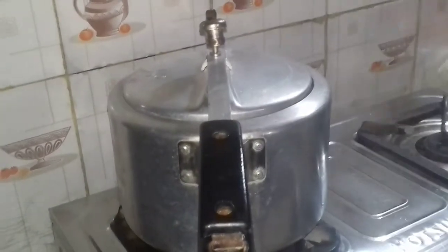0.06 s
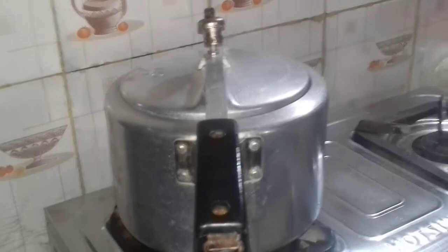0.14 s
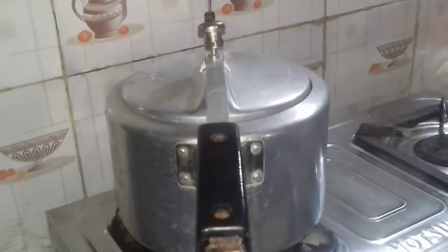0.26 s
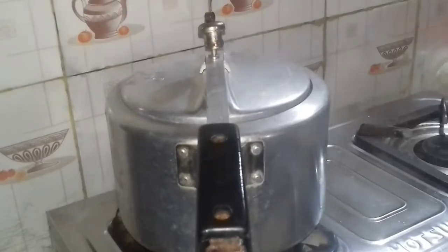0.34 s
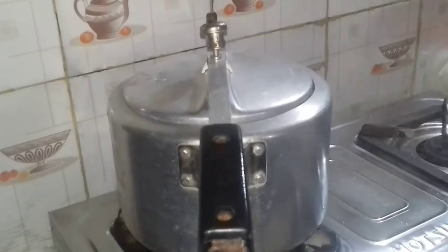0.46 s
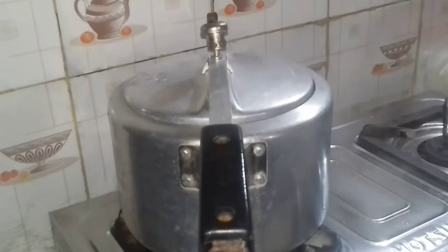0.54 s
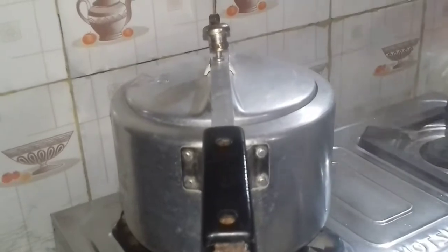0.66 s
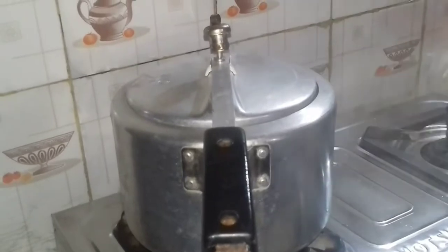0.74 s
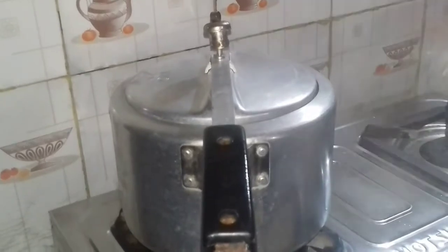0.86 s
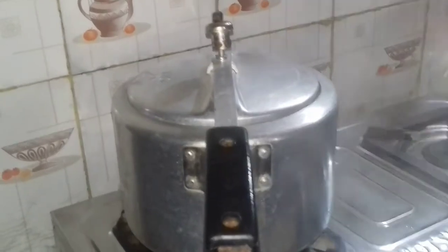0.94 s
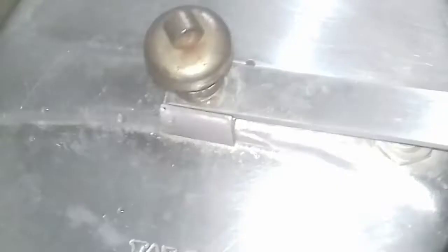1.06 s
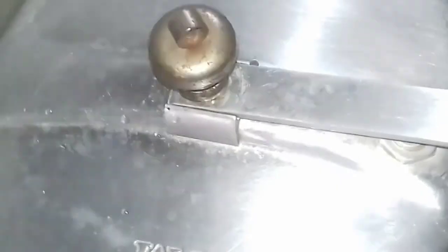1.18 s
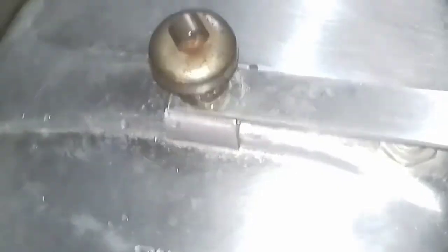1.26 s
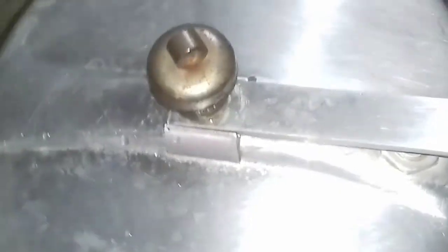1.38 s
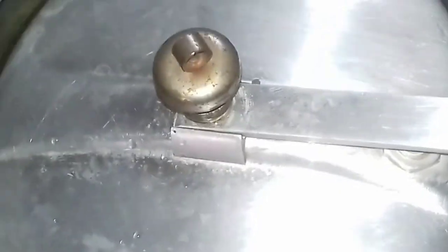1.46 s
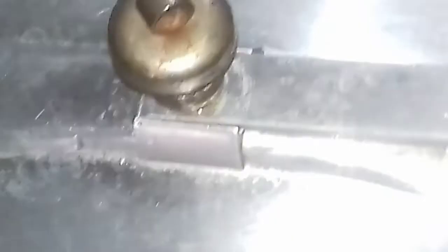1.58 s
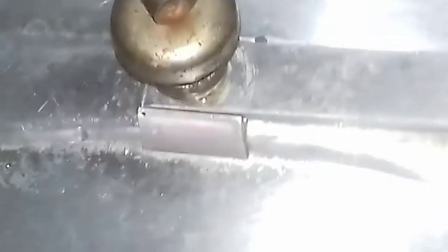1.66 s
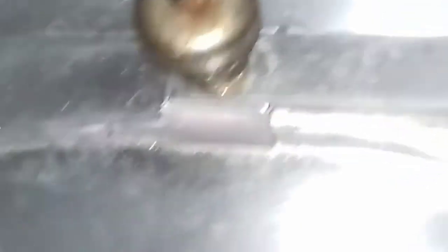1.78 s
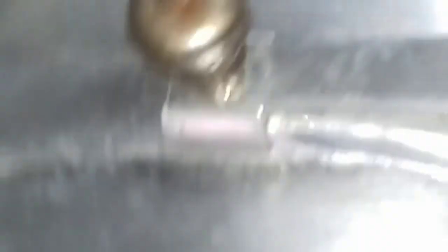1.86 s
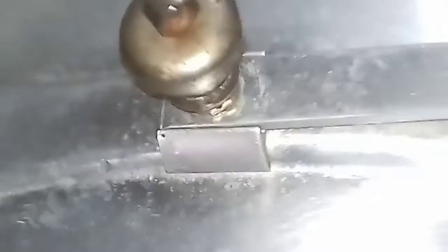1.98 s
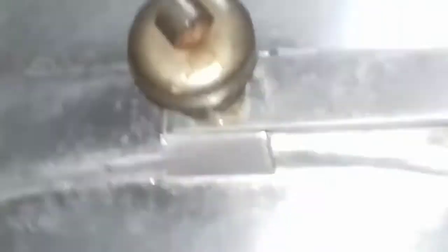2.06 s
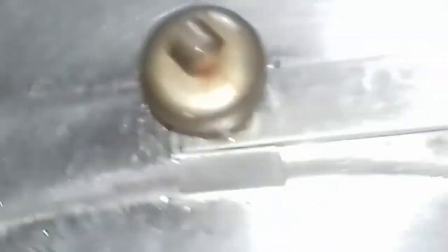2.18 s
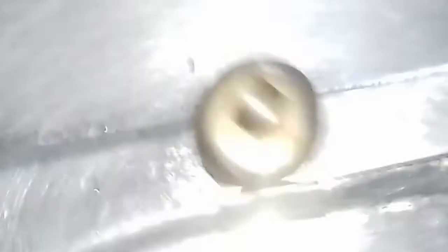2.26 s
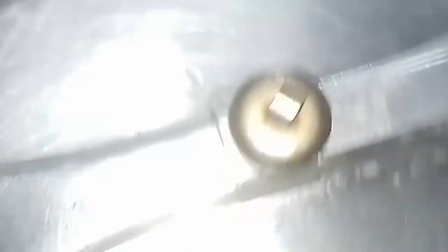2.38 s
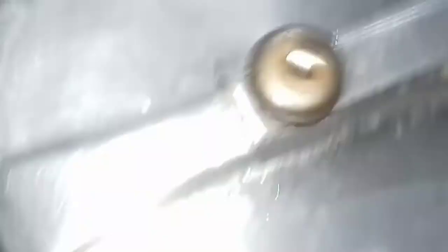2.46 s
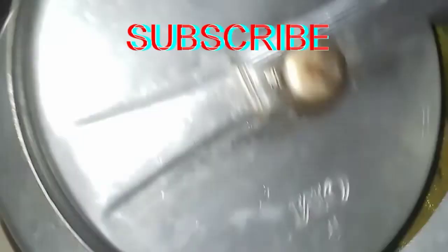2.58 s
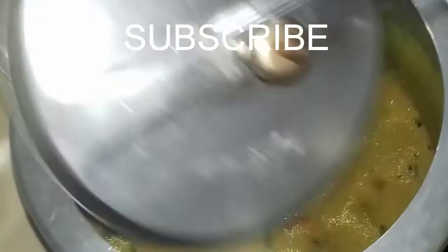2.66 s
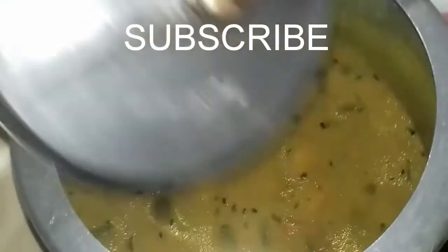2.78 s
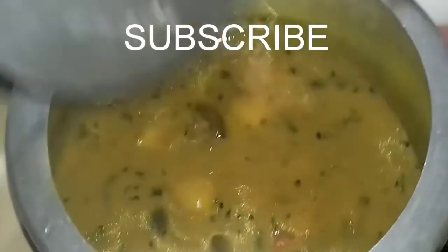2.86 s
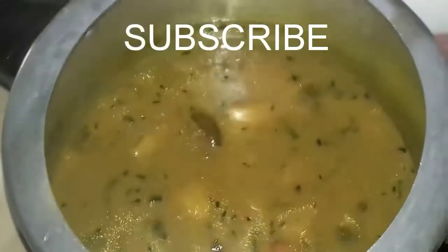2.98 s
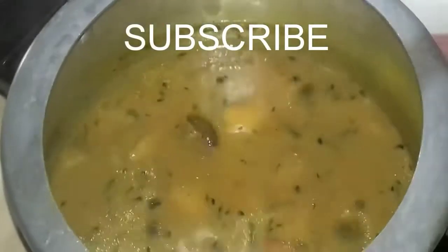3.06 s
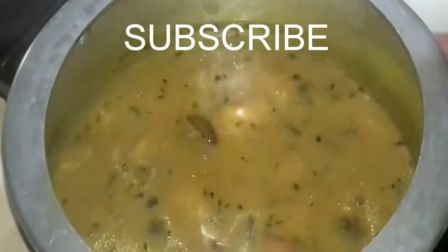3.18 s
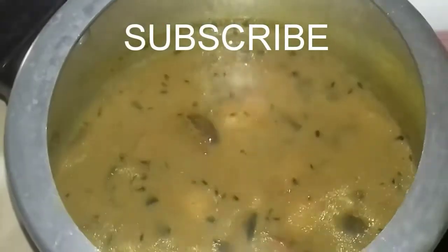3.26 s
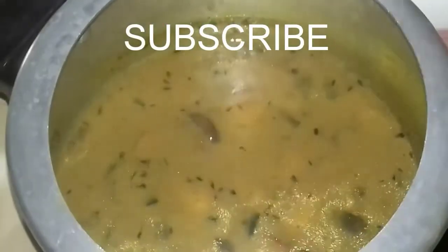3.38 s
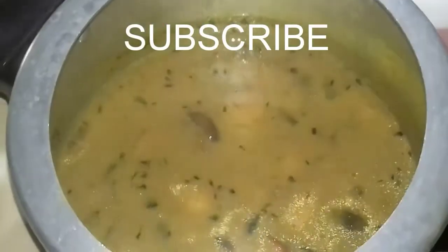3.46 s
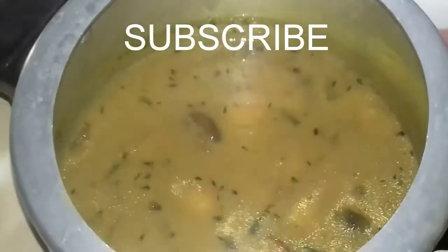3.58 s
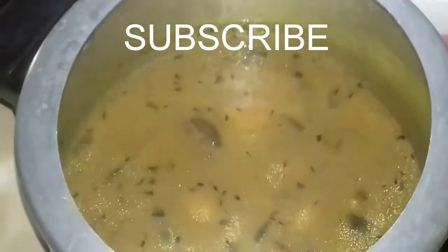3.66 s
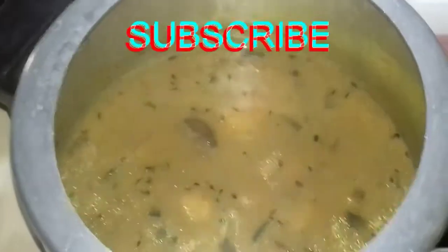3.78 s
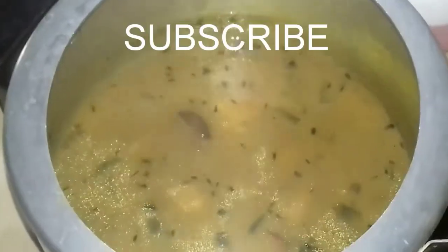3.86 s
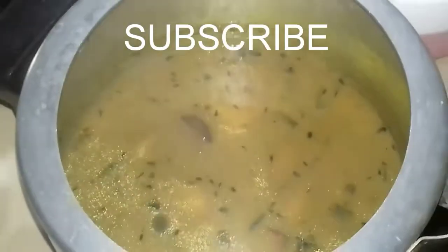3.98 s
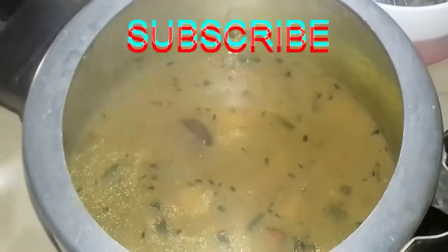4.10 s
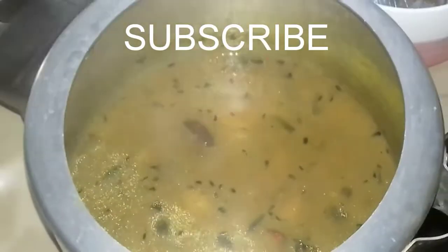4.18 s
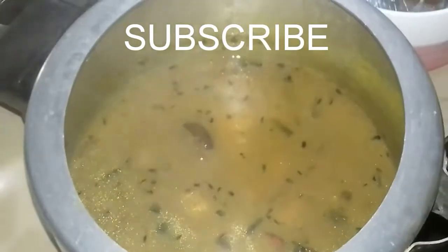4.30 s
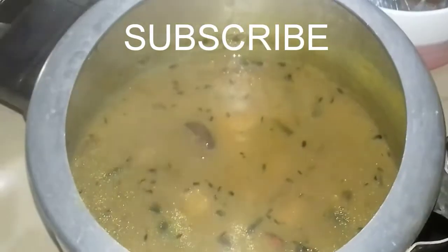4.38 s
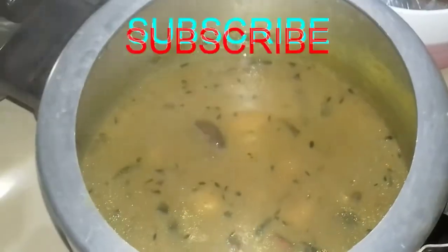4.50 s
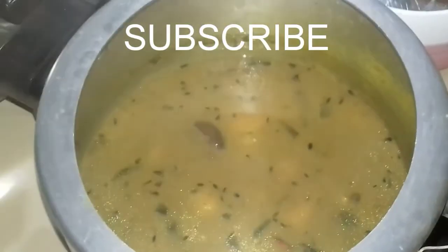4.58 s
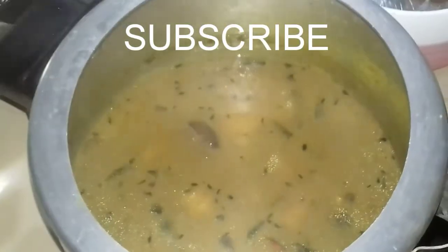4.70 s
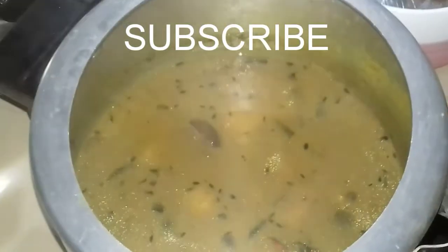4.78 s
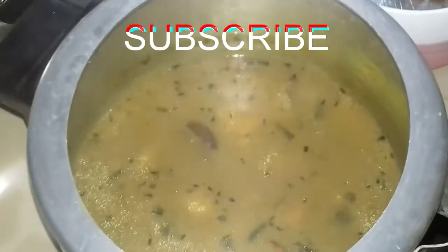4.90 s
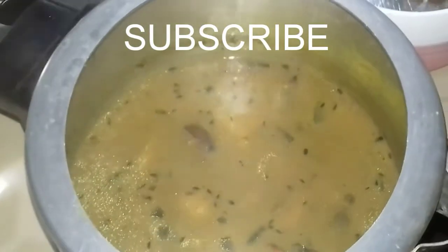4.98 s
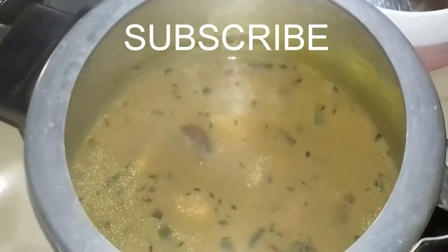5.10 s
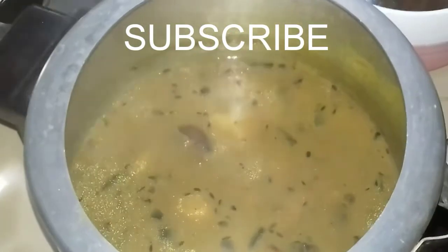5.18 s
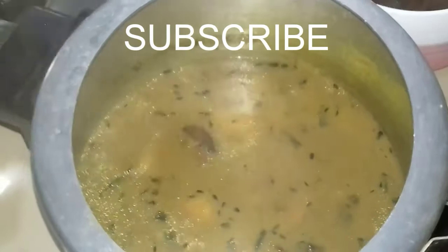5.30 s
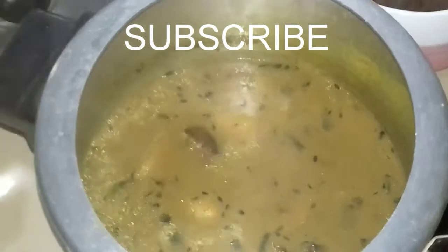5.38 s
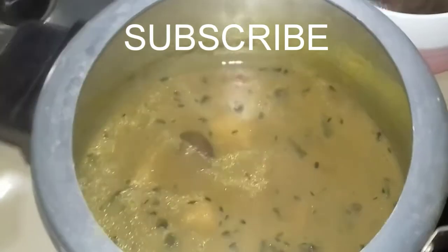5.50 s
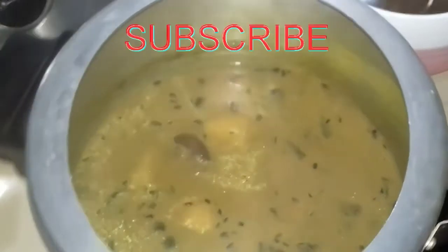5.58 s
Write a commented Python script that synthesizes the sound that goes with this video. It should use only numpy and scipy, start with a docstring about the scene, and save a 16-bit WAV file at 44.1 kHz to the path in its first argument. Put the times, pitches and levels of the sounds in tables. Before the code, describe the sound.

Loud pressure cooker steam hiss fades away, then a metal lid scrapes and knocks loose close by, followed by a few pan clanks.

```python
"""A hiss of steam from a pressure cooker in a tiled kitchen fades to silence, then a lid is worked loose close by.
The steam is noise coloured by the vent's resonances. The lid scrapes, drones and knocks its way out of the rim,
and pans and utensils clank: tiny blows set off the ringing modes of the metal, and a room tail is added.
A handle creaks in a short run of dull ticks. Low, steady noise is the kitchen behind the open pot."""
import sys
import numpy as np
from scipy import signal
from scipy.fft import rfft, irfft
from scipy.io import wavfile
from scipy.ndimage import uniform_filter1d

SR = 44100
rng = np.random.default_rng(int(sys.argv[2]) if len(sys.argv) > 2 else 0)


def log_audio(samples):
    """Write samples as a 16-bit WAV file to the path given in sys.argv[1]."""
    # one column per channel
    frames = np.atleast_2d(samples).T
    # limit to full scale, then quantise
    limited = np.clip(frames, -1, 1)
    pcm = np.round(limited * 32767).astype(np.int16)
    wavfile.write(sys.argv[1], SR, pcm)


N = 248724
TIME, HZ = np.arange(N) / SR, np.fft.rfftfreq(N, 1 / SR)

# What the lid rings with. Each row: pitch in Hz, width in Hz, relative level in dB (before the width counts).
LID_RINGING = [(354, 34.4, 1.5), (594, 84, -10), (716, 270, -12.5), (1270, 250, -20.5), (1882, 65, -3),
               (2410, 100, -10.5), (2980, 48, -20.5), (3525, 42, -23.5), (3900, 32, -28), (4360, 290, -26),
               (5900, 45, -29), (7000, 36, -38), (8760, 80, -75), (10150, 54, -39)]
# The lid's many weak modes between the main ones. Each row: frequency in Hz, relative level in dB per Hz.
LID_WEAK_MODES = [(150, -63), (290, 0), (400, -1), (480, -19), (600, -10), (900, 4), (1400, -4.5),
                  (1800, 11), (2400, -2), (2800, -9), (3300, -16), (4200, -24), (6000, -16.5),
                  (7800, -28.5), (10000, -24), (15500, -34)]


def steam(flutter_db=0.49, echo_db=-9, treble_db=1.24):
    """Rushing steam is noise shaped by the vent; it fades in a straight line while its treble dulls."""
    # The plain hiss. Each row: frequency in Hz, relative level in dB per Hz.
    jet_colour = [(18, -62.5), (30, -23), (103, -16), (352, -19), (626, -16), (1000, -17.5), (1300, -11),
                  (1740, -11.5), (2200, -3.5), (3180, -0.5), (4580, -2), (5960, -12), (10600, -10),
                  (13100, -20), (15700, -25)]
    # Resonances and hollows of the vent and its weight. Each row: centre in Hz, width in Hz, boost or cut in dB.
    vent_peaks = [(1330, 200, 0.5), (1790, 39, -10.5), (1920, 90, 1.5), (2260, 160, 1.5), (2390, 110, -5.5),
                  (2710, 50, 2), (2980, 30, 1.5), (3235, 28, 8), (3670, 30, 0), (4050, 62, 4.5),
                  (4330, 150, 1.5), (5500, 100, 5.5), (5980, 300, -1), (6280, 200, 6.5), (6950, 50, 4),
                  (8436, 30, 1), (9450, 65, 6.5), (10550, 500, -1), (11500, 900, -3.5), (12500, 700, 5.5)]
    level_db, end_s, dulls_db_per_s = -20.4, 1.011, 1

    colour_db = read(jet_colour, HZ)
    for hz, width, db in vent_peaks:
        colour_db = colour_db + db / (1 + (2 * (HZ - hz) / width) ** 2)
    jet = evened(room(noise(colour_db), echo_db))
    treble = band(jet, 7300, 17000, order=1)
    jet = jet + treble * (gain_of(treble_db - dulls_db_per_s * TIME) - 1)
    flutter = evened(noise(read([(8, 1.5), (60, -1), (300, -56)], HZ)))
    fade = np.maximum(1 - TIME / end_s, 0)
    return gain_of(level_db + flutter_db * flutter) * jet * fade


def lid(lowest_hz=305):
    """The hand-held lid knocks on the rim, close by, so it is damped and fairly dry."""
    # Lid against rim. Each row: start in seconds, strength in dB, weight behind the blow in dB,
    # hardness of the contact in dB, ring of the struck spot in Hz, rattle time in seconds (to fall 60 dB).
    lid_blows = [(1.826, -59.5, 7, -6, 2190, .14), (1.89, -50, -7, 13, 3060, 0.024),
                 (1.909, -42.5, 4, -0.5, 2095, 0.044), (2.056, -58, 5, 10, 2750, 0.051),
                 (2.082, -60.5, -12, 18, 2990, 0.028), (2.116, -37, -4.5, -3, 1930, 0.1),
                 (2.171, -46, 0, -2, 1720, 0.135), (2.317, -40, 4.5, 7.5, 1650, 0.077),
                 (2.3394, -30, 3.5, 7.5, 1850, .15), (2.375, -27.5, 13.5, 1.5, 2410, 0.03),
                 (2.406, -30, -11.5, -13, 2460, 0.024), (2.511, -32.5, -3.5, -4.5, 1858, 0.055),
                 (2.5419, -30, -8.5, 2.5, 2090, 0.0443), (2.558, -35, -4.5, 3, 2015, 0.088),
                 (2.636, -46, 4.5, -8.5, 2065, 0.021), (2.654, -44.5, 1.5, -19, 2194, 0.27),
                 (2.718, -52, -1, -9, 1094, 0.012), (2.896, -46, -8.5, -25, 1800, 0.0097),
                 (2.986, -50.5, -20, 6, 2190, 0.03)]
    # A plain blow: level over its strength in dB, for thud, body, clang, clink and tick.
    lid_plain_db = [-6.5, -6, 0, -14, -20]

    out = np.zeros(N)
    for s, strength_db, weight_db, hardness_db, spot_hz, rattle_s in lid_blows:
        metal = ring(LID_RINGING, LID_WEAK_MODES, sustain=0.62, spot_hz=spot_hz, spot_db=-3.5,
                     spot_t60=0.065, dense_db=-3.5, dense_t60=0.065)
        metal = band(metal, lowest_hz, 24000, order=6)  # a small plate radiates little below its first mode
        levels_db = registers(lid_plain_db, strength_db, weight_db, hardness_db, spot_hz)
        add(out, s, knock(metal, levels_db, rattle_s, rattle_db=-10, rattle_lowest_hz=754, wet_db=-10.5))
    return out


def pans():
    """Pans and utensils clank further off: struck metal with more of the room."""
    # Each row: start in seconds, strength in dB, weight behind the blow in dB, hardness of the contact in dB,
    # ring of the struck spot in Hz, rattle time in seconds (to fall 60 dB).
    pan_blows = [(1.0299, -33, 0, 6, 742, 0.21), (1.2545, -35.5, 1.5, 2.5, 1826, .32),
                 (1.343, -46.5, 0, -1, 1550, 0.052), (1.566, -65, 15.5, 10.5, 652, 0.031),
                 (3.698, -52.5, -3.5, 2, 2030, 0.031), (3.771, -55.5, -2, -11, 1770, 0.035),
                 (3.928, -47.5, 5.5, 6.5, 2965, 0.043), (3.958, -53.5, 10, 8, 1720, 0.024),
                 (3.9786, -42, 2.5, 8.5, 2866, 0.1055), (4.0619, -35.5, -4.5, -9, 1335, 0.1),
                 (4.109, -44, 11.5, 4, 1680, 0.039), (4.132, -41, -17, -3, 1990, 0.049),
                 (4.174, -38, -8, -9, 2050, 0.117), (4.195, -41, -1, 5, 2130, 0.035),
                 (4.3163, -36, 3, -12, 1405, 0.027), (4.809, -69.5, 9, 14, 2450, 0.036),
                 (5.136, -49, 4.5, 0, 1570, 0.073), (5.509, -58, -7, -1, 1795, 0.032),
                 (5.606, -59.5, -23, -13, 1530, 0.038)]
    # What the pans ring with. Each row: pitch in Hz, width in Hz, relative level in dB (before the width counts).
    pan_ringing = [(168, 22, -28.5), (296, 58, 12), (900, 44, 11.5), (1380, 54, -33), (1640, 60, -19),
                   (1850, 32, 19), (2136, 62, 1), (2260, 14, -13), (2600, 35, -21), (3000, 94, -21),
                   (3750, 10, -22), (4900, 33, -18), (5700, 80, -34), (6600, 51, -24)]
    # Weak modes between the main ones. Each row: frequency in Hz, relative level in dB per Hz.
    pan_weak_modes = [(130, 8), (200, -6), (260, 14.5), (520, -1.5), (850, -0.5), (1150, -8), (1500, -1),
                      (2100, -5.5), (2650, -15), (3100, -41), (3800, -14.5), (5000, -20), (6100, -19),
                      (7800, -30.5), (10000, -24.5), (15500, -32)]
    # A plain blow: level over its strength in dB, for thud, body, clang, clink and tick.
    pan_plain_db = [-5.5, -5.5, 0, -14, -20]

    out = np.zeros(N)
    for s, strength_db, weight_db, hardness_db, spot_hz, rattle_s in pan_blows:
        metal = ring(pan_ringing, pan_weak_modes, sustain=0.4, spot_hz=spot_hz, spot_db=0.0,
                     spot_t60=0.033, dense_db=8, dense_t60=0.075)
        levels_db = registers(pan_plain_db, strength_db, weight_db, hardness_db, spot_hz)
        add(out, s, knock(metal, levels_db, rattle_s, rattle_db=-8.5, rattle_lowest_hz=150, wet_db=-6))
    return out


def drag(waver=0.0885, judder_db=4):
    """With each pull, tiny slips along the rim ring the lid and keep its lowest mode droning unevenly."""
    # Each row: start in seconds, length in seconds, scrape level in dB, level in dB of the lowest mode's drone.
    lid_pulls = [(2.116, 0.13, -48, -55), (2.232, 0.11, -51.5, -42.5), (2.372, .06, -25.5, -39.5),
                 (2.469, 0.069, -37.5, -36), (2.604, 0.14, -40.5, -58)]
    peak_share, start_db, end_db = 0.71, -3, -14  # each pull gathers speed, then sticks
    start_hz, sag_hz_per_s = 362, 100  # the drone sinks as the lid comes free

    scrape, drone = np.zeros((2, N))
    for s, length, scrape_db, drone_db in lid_pulls:
        # silent outside the pull
        arch_db = np.interp((TIME - s) / length, [0, peak_share, 1], [start_db, 0, end_db], -np.inf, -np.inf)
        scrape = scrape + gain_of(scrape_db + arch_db)
        drone = drone + gain_of(drone_db + arch_db)

    slips = rng.standard_normal(N) * (rng.random(N) < 700 / SR)  # about 700 a second
    metal = ring(LID_RINGING, LID_WEAK_MODES, sustain=0.67, spot_hz=2040, spot_db=-9,
                 spot_t60=0.031, dense_db=-4.5, dense_t60=0.17)
    grit = evened(band(signal.fftconvolve(slips, metal)[:N], 510, 16000, order=1))

    speed, grip = (noise(read([(30, -2), (70, -3.5), (200, -58)], HZ)) for _ in range(2))
    drone_hz = start_hz - sag_hz_per_s * np.clip(TIME - lid_pulls[0][0], 0, .5)
    cycles = np.cumsum(drone_hz * (1 + waver * speed)) / SR
    hum = evened(np.sin(2 * np.pi * cycles)) * gain_of(judder_db * grip)
    return room(grit * scrape + hum * uniform_filter1d(drone, size=300), wet_db=-18.5)


def creak(pitch_hz=620, t60=0.0077, jitter_s=.0007, uneven_db=1.5, count=7):
    """A handle creaks in a short run of uneven slips, each one a dull, quickly damped tick."""
    start_s, slips_per_s, level_db = 3.815, 83, -38.5
    out, t = np.zeros(N), np.arange(SR // 40) / SR
    for k, (late, loud) in enumerate(rng.standard_normal((count, 2))):
        tick = gain_of(level_db + uneven_db * loud) * np.sin(2 * np.pi * pitch_hz * t) * dying(t, t60)
        add(out, start_s + k / slips_per_s + jitter_s * late, tick)
    return out


def kitchen():
    """Low, steady room noise that barely wavers; its treble is wide, its bass central."""
    # Colour of the room noise. Each row: frequency in Hz, relative level in dB per Hz.
    kitchen_colour = [(25, -32.5), (50, -8), (75, -4), (120, -2), (250, -6.5), (450, -10.5), (800, -12),
                      (1300, -16), (2150, -19), (2500, -28), (3200, -26.5), (4000, -32), (8000, -38),
                      (15700, -41.5)]
    # Stereo width. Each row: frequency in Hz, level of the side over the middle in dB.
    kitchen_width = [(60, -27), (150, -23.5), (380, -17.5), (950, -14.5), (2380, -7), (5980, 1.5),
                     (15000, -0.5)]
    level_db = -55.5

    waver_db = .35 * noise(read([(3, 0), (15, -8), (80, -60)], HZ))
    mid = noise(read(kitchen_colour, HZ))
    other = noise(read(kitchen_colour, HZ))
    side = irfft(rfft(other) * gain_of(read(kitchen_width, HZ)), N)
    return gain_of(level_db + waver_db) * np.array([mid + side, mid - side])


def ring(modes, thicket, sustain, spot_hz, spot_db, spot_t60, dense_db, dense_t60):
    """Metal's answer to one tap: its main modes, the ring of the struck spot and a thicket of weak, short modes."""
    t = np.arange(SR * 2 // 3) / SR
    main = np.zeros(len(t))
    for hz, width, db in modes:
        wave = np.sin(2 * np.pi * (hz * t + rng.random()))
        main += gain_of(db) * np.sqrt(width) * dying(t, sustain * 3.34 / width) * wave  # wide modes die sooner
    spot = np.sin(2 * np.pi * spot_hz * t) * dying(t, spot_t60)
    # the weak modes overlap into an even colour, but scatter the tap in time
    colour = gain_of(read(thicket, np.fft.rfftfreq(len(t), 1 / SR)))
    scatter = np.angle(rfft(rng.standard_normal(len(t)) * dying(t, dense_t60)))
    dense = irfft(colour * np.exp(1j * scatter), len(t)) * dying(t, 4 * dense_t60)
    return evened(main) + gain_of(spot_db) * evened(spot) + gain_of(dense_db) * evened(dense)


def knock(metal, levels_db, rattle_s, rattle_db, rattle_lowest_hz, wet_db):
    """The edges graze, strike and chatter, and the metal answers in five registers."""
    t = np.arange(len(metal)) / SR
    graze_s = .002 + .014 * rattle_s  # the edges graze before the blow, longer for a long rattle
    blow = round(graze_s * SR) + 1
    pressure = np.minimum(t * SR / blow, 1) * dying(np.maximum(t - blow / SR, 0), rattle_s)
    touches = rng.choice([-1., 1.], len(t)) * (rng.random(len(t)) < 4000 / SR)  # about 4000 a second
    # too light to stir the lowest modes much
    chatter = band(touches * pressure, rattle_lowest_hz, 18000, order=1)
    contact = gain_of(rattle_db) * chatter + signal.unit_impulse(len(t), blow)
    struck = signal.fftconvolve(contact, metal)[:len(t)]
    return balance(room(struck, wet_db), levels_db)


def registers(plain_db, strength_db, weight_db, hardness_db, spot_hz):
    """Weight fills the low end, a hard contact trades body for treble, and slack metal gives more body."""
    # What thud, body, clang, clink and tick gain, in dB, from one dB of weight.
    per_weight = [0.96, 0.46, 0.014, 0, 0.13]
    # What the same five gain, in dB, from one dB of hardness.
    per_hardness = [0.18, -0.24, 0.031, 0.84, 0.43]
    slack_hz, slack_db_per_octave, slack_most_db = 1960, 8, 8.5  # a spot that rings lower is slack metal

    slack_db = np.clip(slack_db_per_octave * np.log2(slack_hz / spot_hz), 0, slack_most_db)
    shape_db = weight_db * np.array(per_weight) + hardness_db * np.array(per_hardness)
    return strength_db + np.array(plain_db) + shape_db + [0, slack_db, 0, 0, 0]


def balance(sound, levels_db, blend_octaves=.18):
    """A causal filter that brings the attack of each register to its level and blends between registers."""
    # Borders in Hz of the five registers of a blow: thud, body, clang, clink and tick.
    edges_hz = [130, 480, 1400, 2700, 3500, 16500]

    blend, points = 2 ** blend_octaves, []
    for db, lo, hi in zip(levels_db, edges_hz, edges_hz[1:]):
        attack = band(sound, lo, hi, order=7)[:SR * 3 // 50]  # the first 60 ms
        lift_db = db - 20 * np.log10(np.std(attack))
        points += [(lo * blend, lift_db), (hi / blend, lift_db)]
    log_gain = np.log(gain_of(read(points, abs(np.fft.fftfreq(len(sound), 1 / SR)))))
    response = np.exp(np.conj(signal.hilbert(log_gain)))  # minimum phase: nothing sounds before the blow
    balanced = np.fft.ifft(np.fft.fft(sound) * response).real
    return band(balanced, edges_hz[0], edges_hz[-1])


def room(x, wet_db):
    """Adds the tiled room's tail: dense reflections, each band dying at its own speed."""
    # Each row: frequency in Hz, time to fall 60 dB in seconds.
    room_decay = [(150, 0.63), (400, 0.49), (1000, 0.49), (2000, 0.3), (3000, 0.42), (7000, 0.4),
                  (15000, 0.073)]

    hz, t, z = signal.stft(rng.standard_normal(SR * 2 // 3), SR, nperseg=256)
    shape = dying(t, read(room_decay, hz)[:, None]) * (1 - np.exp(-t / 0.00096))
    tail = signal.istft(z * shape, SR, nperseg=256)[1]
    return x + gain_of(wet_db) * signal.fftconvolve(x, tail / np.linalg.norm(tail))[:len(x)]


def gain_of(db):
    """Decibels to amplitude."""
    return 10 ** (np.asarray(db) / 20)


def evened(x):
    """Scales to an rms (average strength) of 1."""
    return x / np.sqrt(np.mean(x ** 2) + 1e-20)


def read(points, hz):
    """Joins a table of (Hz, value) with straight lines on a log-frequency axis."""
    f, value = np.transpose(points)
    return np.interp(np.log(hz + 1), np.log(f + 1), value)


def add(mix, s, sound):
    """Lays a sound into the mix at time s."""
    part = mix[round(s * SR):][:len(sound)]
    part += sound[:len(part)]


def band(x, lo_hz, hi_hz, order=3):
    """Causal band-pass: keeps what lies between two frequencies."""
    edges = [lo_hz, min(hi_hz, SR / 2 - 1)]
    return signal.sosfilt(signal.butter(order, edges, "band", fs=SR, output="sos"), x)


def noise(db):
    """Noise of rms 1 with the given spectrum."""
    return evened(irfft(rfft(rng.standard_normal(N)) * gain_of(db), N))


def dying(t, t60):
    """Falls 60 dB in t60 seconds."""
    return np.exp(-np.log(1000) * t / t60)


def scene():
    """Steam first, then the handling of the pot straight ahead, over the kitchen noise."""
    close_s, fade_in_s = 1.029, 0.00061
    close = lid() + pans() + drag() + creak() + kitchen()
    return steam() + close * np.clip((TIME - close_s) / fade_in_s, 0, 1)


def record(dry):
    """The recorder's band limit: a steep low-pass at 15900 Hz."""
    low_pass = signal.firwin(511, 15900, window=("kaiser", 9), fs=SR)
    return signal.oaconvolve(dry, low_pass[None], "same")


dry = scene()
out = record(dry)
log_audio(out)
```